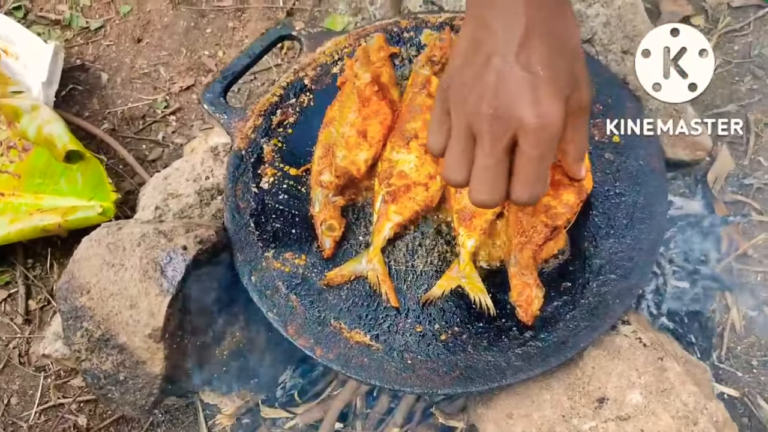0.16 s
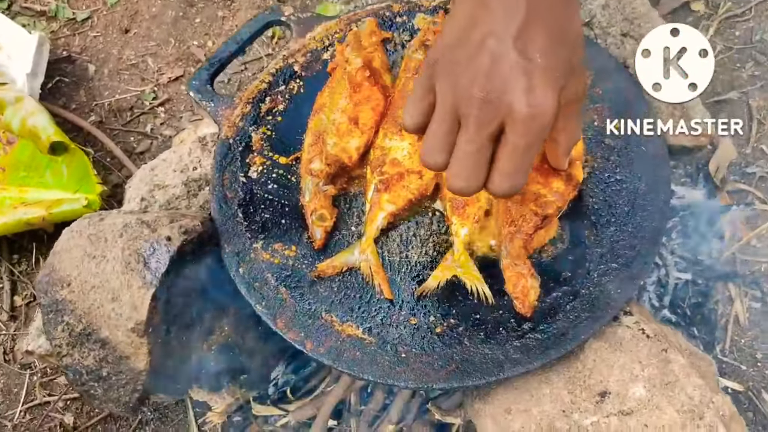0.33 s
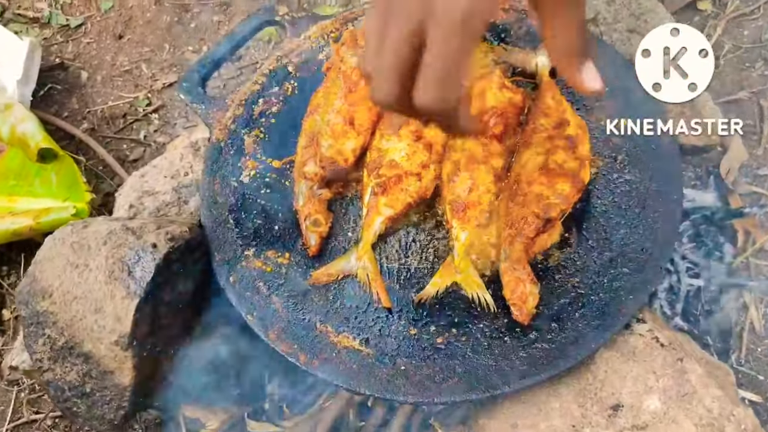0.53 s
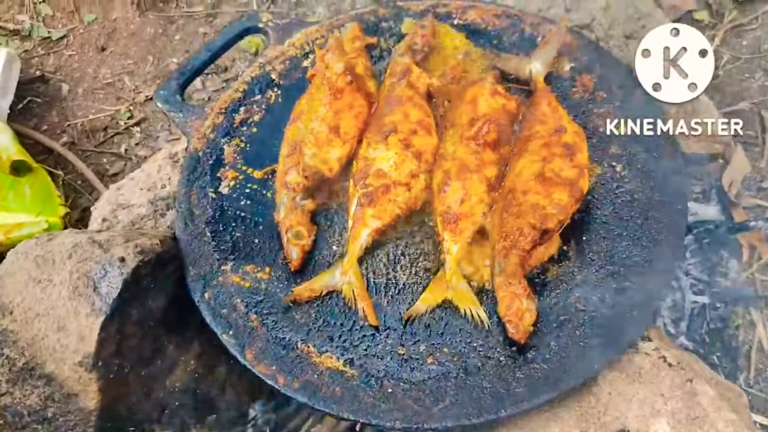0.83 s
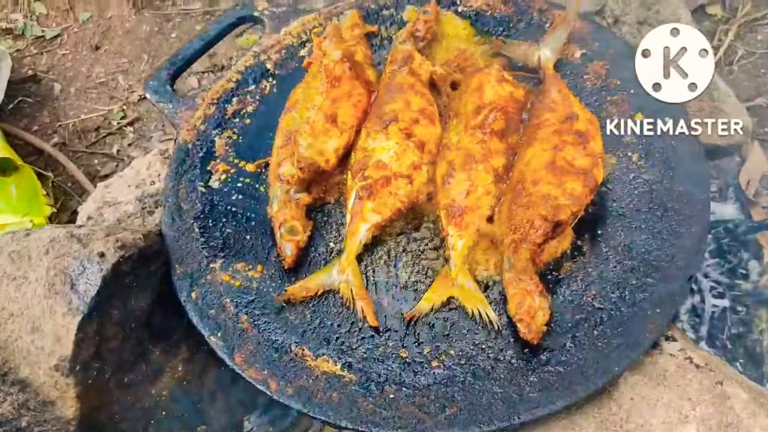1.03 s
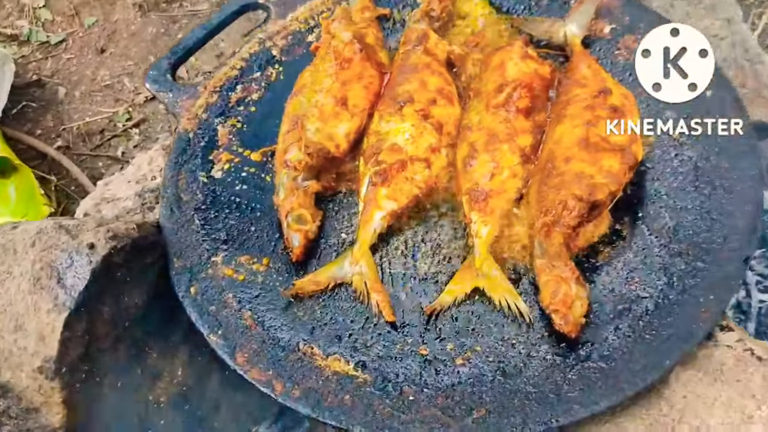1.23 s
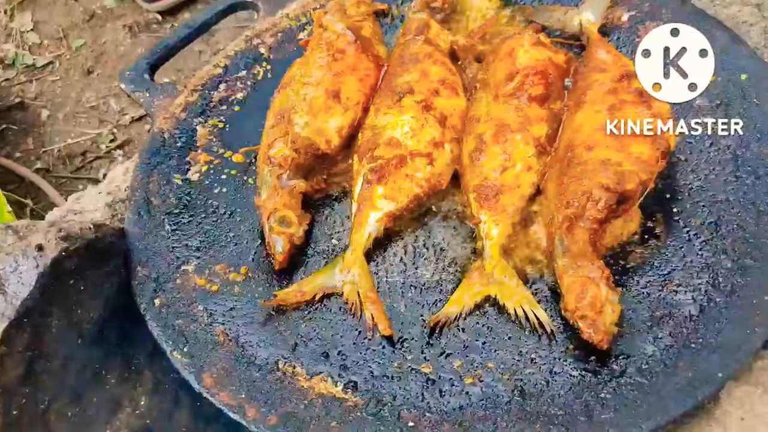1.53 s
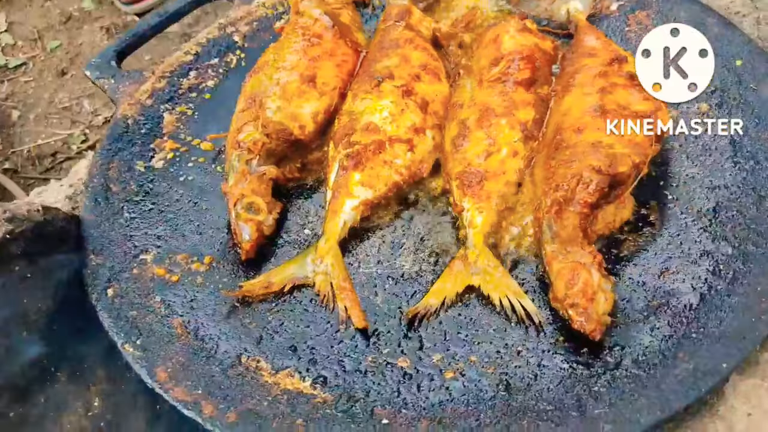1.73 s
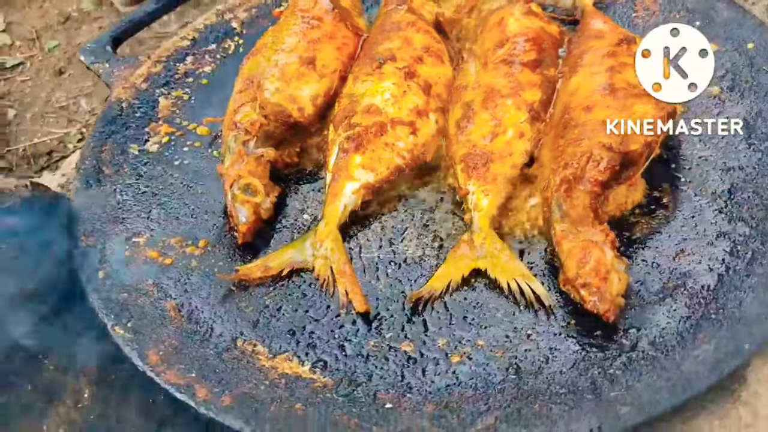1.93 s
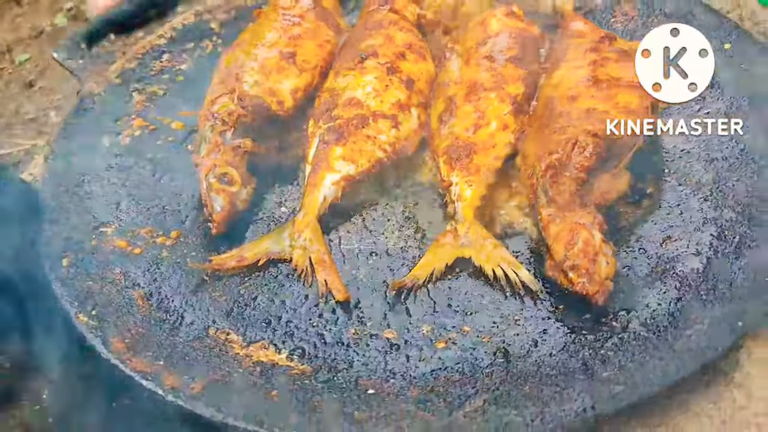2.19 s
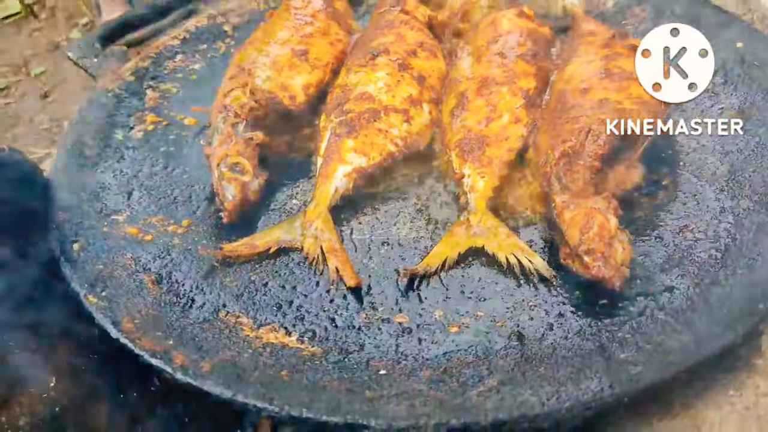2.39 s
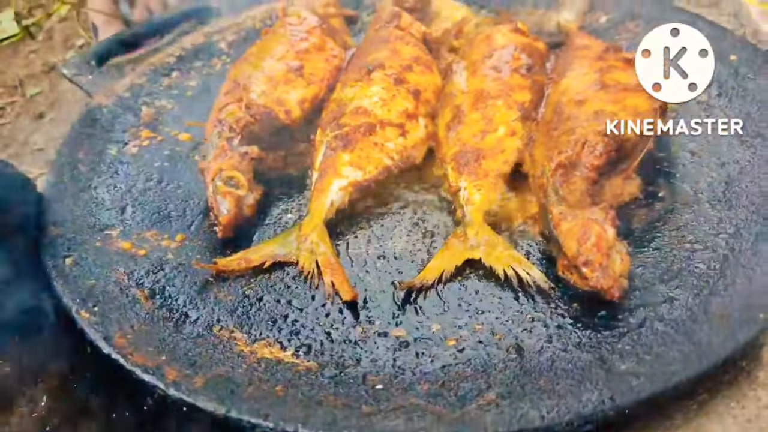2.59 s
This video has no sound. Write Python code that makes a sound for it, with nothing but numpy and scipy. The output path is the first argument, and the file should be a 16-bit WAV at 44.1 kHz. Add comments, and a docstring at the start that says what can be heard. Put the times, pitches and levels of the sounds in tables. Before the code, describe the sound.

Fish sizzling brightly in hot oil on an iron pan outdoors, with sharp spits and pops

```python
"""A bright, dense sizzle with sharp spits: fish frying in oil on an iron pan over a wood fire outdoors.
Four sizes of steam bubble are random clicks in flurries, each size filtered to its own band.
Spits are snaps of high noise; pops are a crack and two falling puffs; thuds are short low tones.
Filtered noise makes one fluttering flare of flame, a faint outdoor murmur and light wind rumble.
All of it reaches the two microphone ports of a hand-held phone close by."""
import sys
import numpy as np
from scipy import signal
from scipy.fft import rfft, irfft
from scipy.io import wavfile
from scipy.ndimage import uniform_filter1d

SR = 44100
rng = np.random.default_rng(int(sys.argv[2]) if len(sys.argv) > 2 else 0)


def wrap_up_sound(samples):
    """Save the sound to the file named by the first command line argument, as 16-bit audio."""
    columns = np.atleast_2d(samples).T
    # keep every value between -1 and 1, then stretch to whole-number steps
    tamed = np.clip(columns, -1, 1)
    steps = np.round(tamed * 32767).astype(np.int16)
    wavfile.write(sys.argv[1], SR, steps)


N = 121275  # samples, 2.75 s
SIDES = np.array([[.5], [-.5]])  # shares a left-minus-right level between the ports


def undb(db):
    """Decibels to an amplitude factor."""
    return 10 ** (np.asarray(db) / 20)


def unit(x):
    """Scale to an RMS of 1 over the whole signal."""
    return x / np.sqrt(np.mean(x ** 2))


def curve(table, axis):
    """One column of a table, joined by straight lines in time."""
    table = np.array(table, float)
    return np.interp(np.arange(N) / SR, table[:, 0], table[:, axis])


def colour(x, points):
    """Minimum-phase filter through (pitch_hz, level_db) points, 30 dB down an octave outside them."""
    hz, db = np.array(points, float).T
    hz = np.r_[hz[0] / 2, hz, hz[-1] * 2]
    db = np.r_[db[0] - 30, db, db[-1] - 30]
    f = np.linspace(1, SR / 2, 4097)
    gain = undb(np.interp(np.log(f), np.log(hz), db))
    # folding the cepstrum forward makes the filter causal
    cepstrum = irfft(np.log(gain))
    cepstrum[1:4096] *= 2
    cepstrum[4097:] = 0
    impulse = irfft(np.exp(rfft(cepstrum)))
    return signal.fftconvolve(x, impulse[None], axes=1)[:, :N]


def walk(rate):
    """Random levels, a new one every 1 / rate s, slewed from one to the next; RMS 1."""
    k = int(SR / rate)
    steps = np.repeat(rng.standard_normal(N // k + 1), k)
    return unit(uniform_filter1d(steps, k)[:N])


def pair(alike):
    """Noise for the two ports, with the given correlation between them."""
    mid, side = rng.standard_normal((2, N))
    return np.sqrt(1 + alike) * mid + np.sqrt(1 - alike) * side * np.array([[1], [-1]])


# How much later the left port hears, as the phone moves in: time_s, lag_samples
LAG = [(0, 11.55), (1.5, 10.8), (1.9, 4.4), (2.75, 4.3)]


def port_lag():
    """Delay of the left port behind the right in samples, through time."""
    return curve(LAG, axis=1)


def add(out, burst, s, pan_db):
    """Lay one burst on both ports, later at the left by the lag of that moment."""
    at = int(s * SR)
    for ch, late in ((0, int(port_lag()[at])), (1, 0)):
        out[ch, at + late:at + late + len(burst)] += burst * undb(pan_db * (.5 - ch))


# Tone of the outdoor murmur: pitch_hz, level_db
MURMUR_COLOUR = [(59, -15), (100, -7), (134, -2.5), (206, 5), (316, 0), (500, -12), (650, 3), (1100, -120)]
MURMUR_DB, MURMUR_GUST_DB = -61, -2  # level, and RMS depth of its slow wavering


def murmur():
    """A faint low outdoor bed: filtered noise partly shared by the ports."""
    return unit(colour(pair(0.55), MURMUR_COLOUR)) * undb(MURMUR_DB + MURMUR_GUST_DB * walk(4.37))


# Strength of the wind: time_s, level_db
WIND = [(0.0, -68), (0.06, -51), (0.14, -60), (0.29, -52.5), (1.78, -52), (1.82, -61), (1.95, -51.5),
        (2.05, -58), (2.53, -56), (2.75, -67)]
# Tone of the wind: pitch_hz, level_db
WIND_COLOUR = [(20, -3.5), (50, -7), (90, -10.5), (140, -27.5)]
WIND_PAN_DB, WIND_ALIKE, WIND_FLUTTER_DB = 1.5, 0.53, -2.5  # left minus right; correlation; RMS depth


def wind():
    """Wind gusting on the ports: a deep rumble of noise whose level rises, dips and flutters."""
    rumble = unit(colour(pair(WIND_ALIKE), WIND_COLOUR))
    gusts = undb(curve(WIND, axis=1) + WIND_FLUTTER_DB * walk(8.7))
    return rumble * gusts * undb(WIND_PAN_DB * SIDES)


# Swell of the flame: time_s, level_db
FLAME = [(0.36, -64), (0.396, -60), (0.422, -45.5), (0.534, -40.5), (0.626, -42), (0.642, -39),
         (0.914, -45.5), (0.97, -42), (1.064, -50), (1.168, -52.5), (1.2, -68)]
# Tone of the flame: pitch_hz, level_db
FLAME_COLOUR = [(53, -26), (90, -7), (231, 0.5), (303, -4.5), (408, -1.5), (500, -8.5), (687, -6),
                (900, -16.5), (1170, -33), (1980, -120)]
FLAME_FLUTTER_DB = 1.2  # RMS depth


def flame():
    """A low fluttering whoosh as the fire flares, silent before and after."""
    t = np.arange(N) / SR
    gate = (t > FLAME[0][0]) & (t < FLAME[-1][0])
    roar = unit(colour(pair(0.87), FLAME_COLOUR))
    return roar * gate * undb(curve(FLAME, axis=1) + FLAME_FLUTTER_DB * walk(25.0))


# Soft low thuds from the burning wood, ahead of the ports:
# start_s, peak_db, pitch_hz, left_minus_right_db
THUDS = [(0.068, -36.5, 289, 1), (0.264, -37, 221, 0), (1.153, -42, 434, 0), (1.406, -39, 301, 1),
         (1.745, -42, 206, 4), (2.091, -43, 189, 9), (2.502, -38, 326, 1), (2.647, -60, 277, 7)]
THUD_RISE_S, THUD_FALL_S = 0.00062, 0.0037  # time constants


def thuds():
    """A cycle or two of a low tone that swells at once and dies away."""
    out = np.zeros((2, N + 2048))
    t = np.arange(1536) / SR
    envelope = (1 - np.exp(-t / THUD_RISE_S)) * np.exp(-t / THUD_FALL_S)
    for s, db, hz, pan_db in THUDS:
        thud = np.sin(2 * np.pi * hz * t) * envelope
        add(out, thud / np.abs(thud).max() * undb(db), s, pan_db)
    return out[:, :N]


SNAP_TAIL = .3  # spray after the click, against the click


def snap(noise, t60_s, lo_hz, hi_hz):
    """A click and its dying spray in one band, peak 1."""
    sos = signal.butter(2, [lo_hz, hi_hz], "bandpass", fs=SR, output="sos")
    k = np.arange(len(noise))
    click = k == 0
    spray = SNAP_TAIL * noise * np.exp(-np.log(1000) * k / SR / t60_s)
    x = signal.sosfilt(sos, click + spray)
    return x / np.abs(x).max()


POP_RISE_S, POP_FALL_S, POP_SAG_S = .0002, .0009, .0016  # time constants; sag is the fall in pitch
POP_START, POP_END = 1.5, .8  # pitch at start and end, as shares of the nominal pitch
POP_ROUGH = .3  # RMS depth of noise on the level


def puff(hz, noise):
    """A few rough cycles whose pitch falls, peak 1."""
    t = np.arange(len(noise)) / SR
    fall = (POP_START - POP_END) * POP_SAG_S * (1 - np.exp(-t / POP_SAG_S))
    turns = hz * (POP_END * t + fall)
    rough = 1 + POP_ROUGH * unit(uniform_filter1d(noise, size=12))
    envelope = (1 - np.exp(-t / POP_RISE_S)) ** 2 * np.exp(-t / POP_FALL_S)
    x = np.sin(2 * np.pi * turns) * rough * envelope
    return x / np.abs(x).max()


# Dull pops of big bubbles and burning wood, ahead of the ports:
# start_s, puff_peak_db, nominal_pitch_hz, left_minus_right_db, crack_against_puff_db
POPS = [(0.0184, -25, 1300, -3, -1), (0.2105, -30, 1170, -5, -2), (0.2677, -25, 900, 1, -2),
        (0.7864, -27, 1010, 1, -4), (0.8184, -26, 1000, 6, -5), (0.9434, -19, 1150, 1, -7),
        (1.147, -24, 1110, 0, -6), (1.1548, -20, 1300, 0, -17), (1.4068, -30, 1000, 1, -3),
        (1.5286, -29, 1200, 3, -4), (1.5337, -23, 1300, 5, -15), (1.6627, -24, 1090, 1, -13),
        (1.7932, -23, 1300, -1, -4), (1.8459, -33, 1080, 6, -2), (1.9442, -35, 1140, -1, 0),
        (2.0883, -40, 800, 6, 9), (2.2653, -28, 1100, 0, -7), (2.3081, -22, 1200, -3, 2),
        (2.3502, -31, 1070, -6, -3), (2.4009, -26, 1000, -1, -6), (2.5033, -33, 1000, 0, 2),
        (2.533, -29, 1130, -3, 2), (2.5517, -29, 1020, -4, -5), (2.5733, -28, 1060, -4, 4),
        (2.6445, -27, 1050, 6, -1)]
POP_AFTER_S, CRACK_AFTER_S = .002, .002  # puff and crack sound this long after start_s
POP_ECHO_S, POP_ECHO_DB, POP_ECHO_PITCH = .0021, -4, .65  # second puff: delay, level, pitch share
CRACK_T60_S, CRACK_LO_HZ, CRACK_HI_HZ = 0.007, 2000, 3800


def pops(puff_noise, crack_noise):
    """A crack with a sharp puff, then a lower second puff as the oil closes."""
    out = np.zeros((2, N + 2048))
    for (s, db, hz, pan_db, crack_db), n, m in zip(POPS, puff_noise, crack_noise):
        first = puff(hz, n) * undb(db)
        second = puff(hz * POP_ECHO_PITCH, n[::-1]) * undb(db + POP_ECHO_DB)
        crack = snap(m, CRACK_T60_S, CRACK_LO_HZ, CRACK_HI_HZ) * undb(db + crack_db)
        add(out, first, s + POP_AFTER_S, pan_db)
        add(out, second, s + POP_AFTER_S + POP_ECHO_S, pan_db)
        add(out, crack, s + CRACK_AFTER_S, pan_db)
    return out[:, :N]


# Sharp spits of oil, peaks as meant after the ports:
# start_s, peak_db, left_minus_right_db
SPITS = [(0.0204, -5, -1), (0.1341, -16, -9), (0.2206, -10, -8), (0.2295, -14, -8), (0.2676, -13, 4),
         (0.3051, -14, -3), (0.3193, -11, -6), (0.5007, -15, -4), (0.5392, -10, -5), (0.5538, -12, -7),
         (0.6019, -12, -3), (0.7058, -8, -6), (0.818, -7, -8), (0.9337, -17, -9), (1.0278, -12, -2),
         (1.1252, -10, 1), (1.1467, -9, -8), (1.2872, -14, -9), (1.4285, -8, -7), (1.4876, -13, -8),
         (1.5267, -14, 1), (1.5303, -11, -6), (1.5327, -14, -9), (1.5355, -10, -9), (1.6315, -19, 9),
         (1.7648, -12, 3), (1.8441, -14, 9), (1.9001, -12, 2), (1.9331, -11, 8), (1.9636, -6, -3),
         (2.0142, -9, -2), (2.0376, -10, -6), (2.0536, -11, 1), (2.0612, -5, 2), (2.0708, -9, -2),
         (2.0899, -8, -6), (2.219, -11, -9), (2.2347, -8, 6), (2.2526, -7, -2), (2.409, -9, -3),
         (2.5018, -8, -2), (2.5312, -8, -3), (2.5506, -8, -8), (2.5749, -9, -6), (2.5799, -15, 9),
         (2.6463, -7, -1), (2.6973, -14, -4)]
SPIT_T60_S, SPIT_LO_HZ, SPIT_HI_HZ = 0.004, 4000, 11000
SPIT_PORT_DB = 13  # taken off here, as the port resonances lift the peak


def spits(noise):
    """Brief bright snaps: a click and a few milliseconds of high spray."""
    out = np.zeros((2, N + 2048))
    for (s, db, pan_db), n in zip(SPITS, noise):
        burst = snap(n, SPIT_T60_S, SPIT_LO_HZ, SPIT_HI_HZ)
        add(out, burst * undb(db - SPIT_PORT_DB), s, pan_db)
    return out[:, :N]


def crackle():
    """Spits and pops together, each burst with its own noise."""
    noise = rng.standard_normal((60, 3, 1024))
    return spits(noise[:, 0]) + pops(noise[:, 1], noise[:, 2])


def place(times, sizes, pan_db, lag):
    """Clicks at both ports, the left one late by lag samples."""
    out = np.zeros((2, N))
    at = (np.asarray(times) * SR).astype(int)
    left_at = at + np.round(lag).astype(int)
    np.add.at(out[0], np.clip(left_at, 0, N - 1), sizes * undb(pan_db / 2))
    np.add.at(out[1], np.clip(at, 0, N - 1), sizes * undb(-pan_db / 2))
    return out


LAG_SCATTER, PAN_SCATTER_DB = 4.5, 5.0  # twice the logistic scale in samples; largest offset either way
BIGGEST_DB = 15  # no random burst stands higher over the base click
FLURRY_SHARE = .5  # slow flurries against the quick flicker


def bursts(per_s, spread_db, hiss_db, flicker_db, lag_share=1):
    """Random clicks of exponential dB spread over a hiss of even, denser ones; all come in flurries."""
    out = 0
    for rate, spread, db in ((per_s, spread_db, 0), (SR, 0, hiss_db)):
        when, strength, sign, spot = rng.random((N, 4))[:int(rate * N / SR)].T
        times = when * N / SR
        size_db = np.minimum(-spread * np.log(1 - strength), BIGGEST_DB)
        size = undb(size_db) * np.sign(sign - .5)
        # a click's spot on the pan sets both its pan and its lag
        pan_db = PAN_SCATTER_DB * (2 * spot - 1)
        lag = lag_share * port_lag()[(times * SR).astype(int)]
        lag = lag + LAG_SCATTER * np.log(spot / (1 - spot)) / 2
        out = out + undb(db) * unit(place(times, size, pan_db, lag))
    return out * undb(flicker_db * (FLURRY_SHARE * walk(29.67) + walk(150)))


# Level of the sizzle, ahead of the ports: time_s, level_db, treble_left_minus_right_db,
# middling_bubbles_against_level_db, large_bubbles_against_level_db
SIZZLE = [(0.04, -26.5, -6.5, -9.5, -12.5), (0.06, -30, -8.5, -8, -13.5), (0.28, -25, -5, -10.5, -14.5),
          (0.51, -24, -6.5, -10, -13), (0.83, -25, -4, -11, -14), (0.85, -29, -4.5, -8, -8.5),
          (0.96, -24.5, -5.5, -10, -10.5), (1.05, -25, -6.5, -11.5, -16), (1.52, -24.5, -4.5, -10, -14),
          (1.54, -23.5, -3, -9.5, -12), (1.57, -26, 2, -13, -17.5), (1.78, -22, -1.5, -10, -17.5),
          (1.86, -26, 6, -11.5, -17), (1.96, -22, -2.5, -13, -19.5), (2.07, -21, 0, -14.5, -20.5),
          (2.1, -29, -1, -11, -18), (2.18, -27, -1, -11, -18.5), (2.24, -19, 2.5, -16, -23.5),
          (2.27, -23.5, 3, -8.5, -15), (2.29, -22, 1.5, -11.5, -19.5), (2.56, -22, -2, -10.5, -18),
          (2.61, -21.5, -0.5, -11, -21.5), (2.66, -31, 4, -10, -15), (2.7, -27, 0, -13, -22),
          (2.72, -32, 1, -8, -18.5), (2.74, -27, 2, -10, -22)]
# Tones of the tiniest, small, middling and large bubbles ahead of the ports: pitch_hz, level_db
TINY_COLOUR = [(9000, -12.5), (10500, 2.5), (13000, 0), (16000, -3)]
FINE_COLOUR = [(3500, -27.5), (5000, 0), (6500, 3), (9000, -1.5), (10500, -17.5), (13000, -10)]
MIDDLE_COLOUR = [(1600, -19), (2300, -2.5), (3300, -1.5), (4500, -4), (6000, -9)]
COARSE_COLOUR = [(250, -36), (450, -9), (800, -4.5), (1100, -1.5), (1500, -1), (2200, -2), (3200, -17.5)]
TINY_DB = -8  # tiniest bubbles against the small ones
SHARED_DB = -5  # three of the sizes also hear the bursts of a neighbour
COARSE_LAG_SHARE = .55  # long waves bend round the phone and reach both ports closer together
PORT_GAIN_DB = 12.5  # taken off the treble here, as the port resonances lift it


def sizzle():
    """Steam bubbles of four sizes burst all over the pan, from the top treble down to the midrange."""
    fine = bursts(per_s=5000, spread_db=3.5, hiss_db=-2.5, flicker_db=1)
    # negative spread: the tiniest clicks scatter below the base click
    tiny = bursts(per_s=23000, spread_db=-5, hiss_db=2, flicker_db=2)
    middle = bursts(per_s=2000, spread_db=6.5, hiss_db=4, flicker_db=1.74)
    coarse = bursts(per_s=1200, spread_db=3.5, hiss_db=5, flicker_db=2.43, lag_share=COARSE_LAG_SHARE)
    tiny = tiny + undb(SHARED_DB) * fine
    middle = middle + undb(SHARED_DB) * fine
    coarse = coarse + undb(SHARED_DB) * middle

    treble = unit(colour(fine, FINE_COLOUR)) + undb(TINY_DB) * unit(colour(tiny, TINY_COLOUR))
    treble = treble * undb(curve(SIZZLE, axis=2) * SIDES - PORT_GAIN_DB)
    middling = undb(curve(SIZZLE, axis=3)) * unit(colour(middle, MIDDLE_COLOUR))
    large = undb(curve(SIZZLE, axis=4)) * unit(colour(coarse, COARSE_COLOUR))
    return undb(curve(SIZZLE, axis=1)) * (treble + middling + large)


def scene():
    """The sizzle with its spits and pops, over the fire and the outdoor bed."""
    return sizzle() + crackle() + thuds() + flame() + murmur() + wind()


def resonance(x, hz, width_hz, lift_db):
    """The extra ringing that lifts one narrow band of the sound."""
    ring = signal.lfilter(*signal.iirpeak(hz, hz / width_hz, fs=SR), x)
    return (undb(lift_db) - 1) * ring


# Ring and bass of the left port, then the right:
# resonance_hz, width_hz, lift_db, bass_db
PORTS = [(8590, 1070, 23.5, 3.5), (7460, 1126, 19, 0)]
CASE_HZ, CASE_WIDTH_HZ, CASE_DB = 1095, 116, 4.5  # a weak resonance at the left port only
CEILING, TOP_HZ = .72, 15600  # level the peaks are rounded towards; top of the band


def record(dry):
    """Each port rings at its own pitch and has its own bass; the loudest peaks are rounded, the top is cut."""
    out = []
    for x, (hz, width_hz, lift_db, bass_db) in zip(dry, PORTS):
        bass = signal.lfilter(*signal.butter(1, 800, fs=SR), x)
        out.append(x + resonance(x, hz, width_hz, lift_db) + (undb(bass_db) - 1) * bass)
    out[0] = out[0] + resonance(out[0], CASE_HZ, CASE_WIDTH_HZ, CASE_DB)
    rounded = CEILING * np.tanh(np.array(out) / CEILING)
    top_cut = signal.ellip(14, .2, 95, TOP_HZ, fs=SR, output="sos")
    return signal.sosfilt(top_cut, rounded)


dry = scene()
out = record(dry)
wrap_up_sound(out)
```